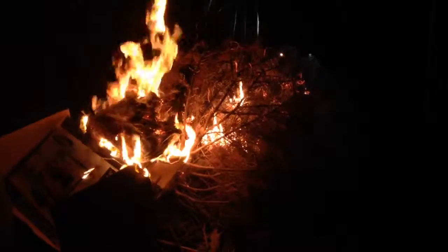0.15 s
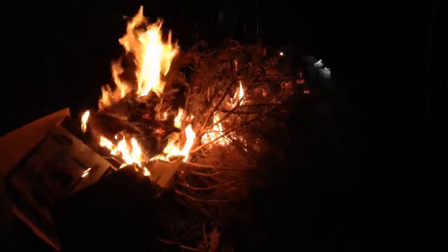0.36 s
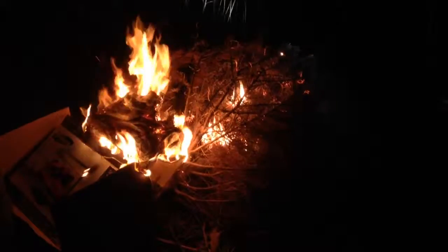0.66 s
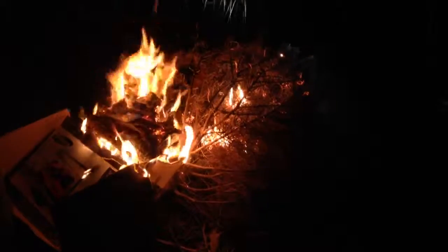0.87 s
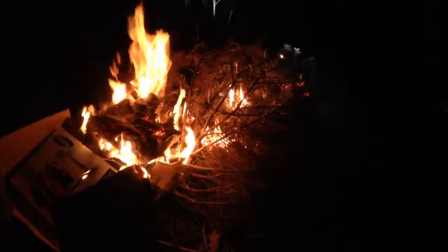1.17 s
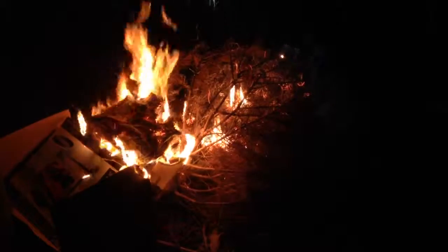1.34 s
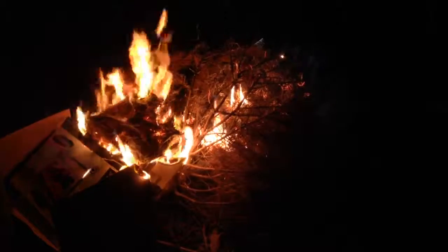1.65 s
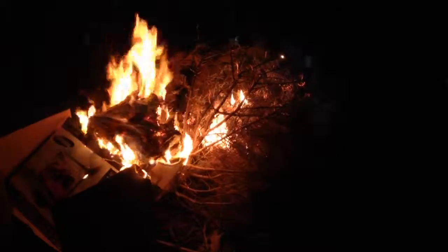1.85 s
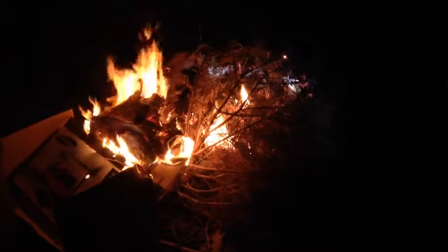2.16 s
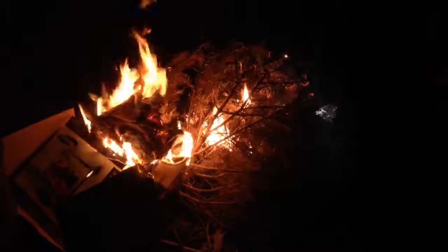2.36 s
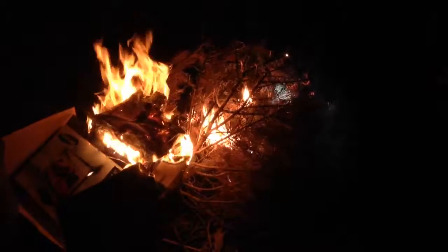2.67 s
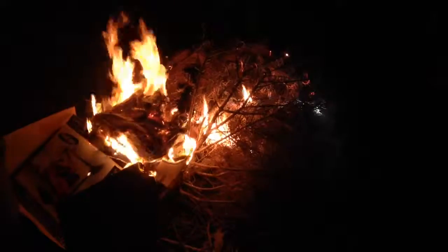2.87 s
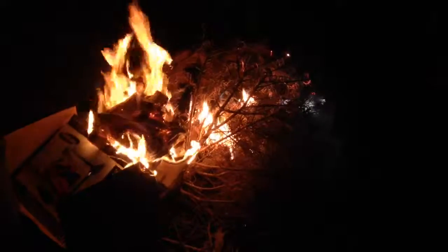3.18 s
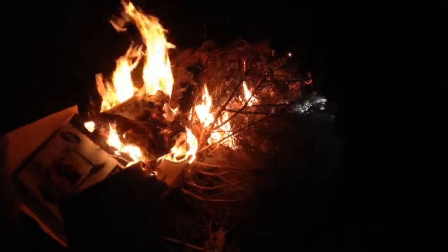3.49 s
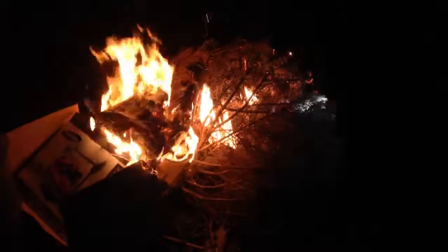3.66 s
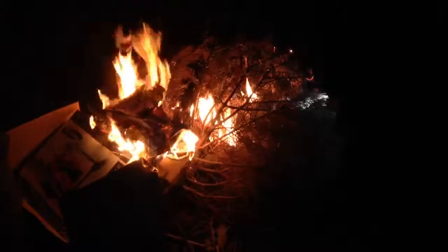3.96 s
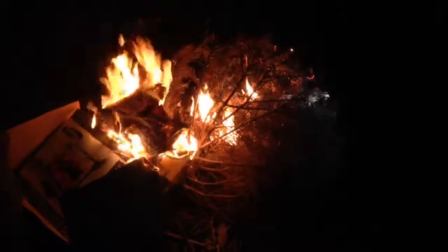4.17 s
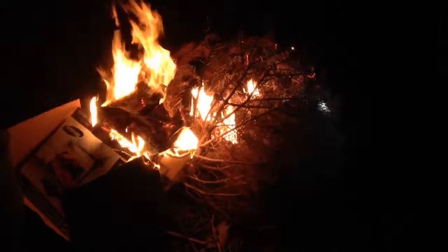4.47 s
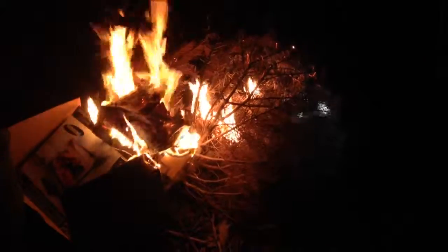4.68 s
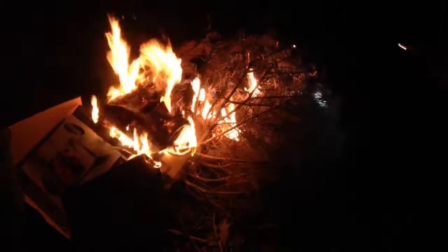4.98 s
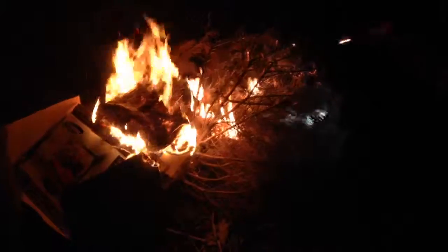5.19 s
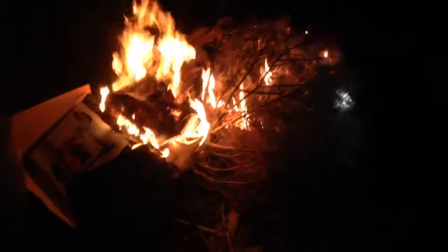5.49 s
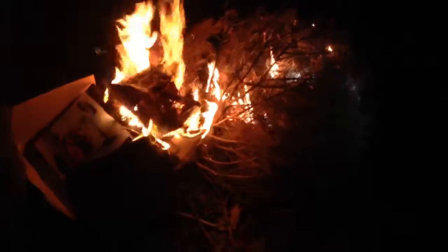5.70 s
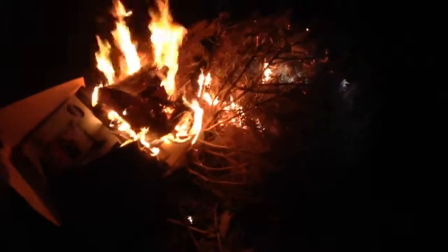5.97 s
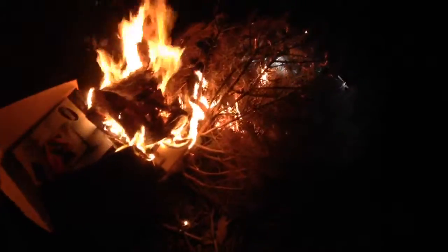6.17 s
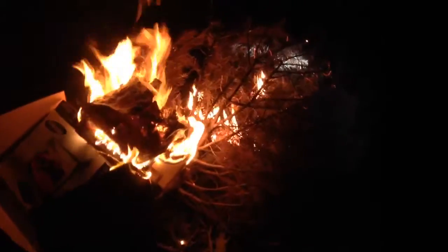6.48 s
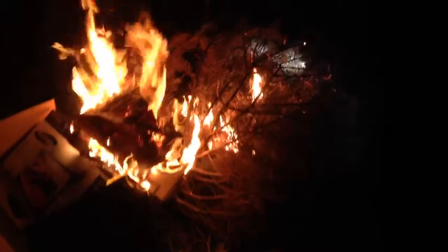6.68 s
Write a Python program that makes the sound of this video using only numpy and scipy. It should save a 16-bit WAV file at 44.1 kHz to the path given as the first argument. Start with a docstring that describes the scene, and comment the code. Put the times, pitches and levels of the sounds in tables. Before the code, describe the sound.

A small open fire of dry fir twigs and cardboard burns outdoors at night, heard close, dry and in mono for nearly seven seconds. Throughout, flames flutter low and rush unevenly under fine sizzling and hundreds of faint ticks. Faint, very high whistles flicker in the first 0.4 s. From 0.44 to 0.62 s a rapid volley of bright, splintering cracks peaks at 0.53 with the loudest, ringing snap; a smaller snap and sizzling flare follow at 0.8. Sizzle swells around 1.5 and 2.3 s, with crisp snaps at 1.83, 2.34 and 2.47. From 3 to 4.6 s it is calmer: soft low puffs, small ticks. At 4.7 s a brief squeaky gas spurt comes with a sizzle. At 5.13 a hard crack and thud start a second volley, lasting until 5.26. Then light crackling continues, with a tiny chirping hiss at 6.12, to the end.

```python
"""Twigs and resin pockets burst with sharp cracks as a dry fir tree and a cardboard box burn in the open at night.
Each crack is a ragged noise spike with a splintering tail, heard through resonances; some leave a twig ringing.
Needles sizzle in flares as dense clicks over hiss; gas escapes as jets of narrow noise and gliding whistles.
Underneath, the flames are shaped noise, fluttering and rushing, with soft puffs of decaying low tone."""
import sys
import numpy as np
from scipy import signal
from scipy.fft import rfft, irfft
from scipy.io import wavfile

SR = 44100
rng = np.random.default_rng(int(sys.argv[2]) if len(sys.argv) > 2 else 0)


def pcm_store(signal):
    """Save signal as 16-bit PCM."""
    levels = np.round(np.clip(np.atleast_2d(signal), -1, 1) * 32767)
    wavfile.write(sys.argv[1], SR, levels.astype(np.int16).T)


N = 301644   # samples


def from_db(db):
    """Decibels to amplitude gain."""
    return 10 ** (np.asarray(db) / 20)


def rms_one(x):
    """Scale to unit mean power."""
    return x / np.sqrt(np.mean(x ** 2) + 1e-20)


def energy_one(x):
    """Scale to unit summed energy."""
    return x / np.sqrt(np.sum(x ** 2) + 1e-20)


def level_over_1_ms(x):
    """Scale to the energy of 1 ms at unit RMS."""
    return energy_one(x) * np.sqrt(SR / 1000)


def curve(rows):
    """Interpolate rows of (seconds, value) to every sample."""
    s, value = np.transpose(rows)
    return np.interp(np.arange(N) / SR, s, value)


def add(out, start_s, sound):
    """Mix a sound into out, cut off at the end."""
    start = int(np.clip(round(start_s * SR), 0, N - 1))
    out[start:start + len(sound)] += sound[:N - start]


def drift(knots_per_s):
    """Random wander of unit RMS, linear between Gaussian knots."""
    knots = rng.standard_normal(N // 20)
    position = np.arange(N) / SR * knots_per_s
    return rms_one(np.interp(position, np.arange(len(knots)), knots))


def resonance(x, hz, width_hz):
    """Two-pole band-pass with unit gain at its peak."""
    hz_safe, width_safe_hz = min(hz, .4 * SR), min(width_hz, .35 * SR)
    b, a = signal.iirpeak(hz_safe, hz / width_safe_hz, fs=SR)
    return signal.lfilter(b, a, x + 1e-18)


def coloured(x, spectrum):
    """Filter x by a spectrum interpolated over log frequency; unit power."""
    hz, db = np.transpose(spectrum)
    bin_hz = np.maximum(np.arange(N // 2 + 1) * SR / N, 1)
    gain_db = np.interp(np.log(bin_hz), np.log(hz), db)
    return rms_one(irfft(rfft(x) * from_db(gain_db), N))


def grains(per_s, spread_db):
    """Single-sample clicks at random, most small and a few large."""
    size = from_db(spread_db * np.minimum(rng.exponential(1, N), 4))
    present = rng.random(N) < per_s / SR
    return present * size * rng.choice([-1, 1], N)


# Strength of the flames. Each row: time in seconds, rush level in dB before flicker.
FLAME_STRENGTH = [(0.0, -63.5), (0.42, -61), (0.62, -72.5), (1.0, -68), (1.35, -70), (1.6, -64.5),
                  (1.87, -68), (3.03, -64), (3.27, -66), (4.0, -63), (4.36, -67), (5.26, -66.5),
                  (5.79, -63.5), (6.15, -66), (6.84, -66.5)]
# Spectrum of the low flutter. Each row: frequency in Hz, relative density in dB per Hz.
FLUTTER_SPECTRUM = [(25, -35), (50, -48), (80, -11.5), (120, -6), (180, 2), (250, -2.5), (400, -4.5),
                    (800, -27.5)]
# Spectrum of the hot gas. Each row: frequency in Hz, relative density in dB per Hz.
RUSH_SPECTRUM = [(200, -25), (400, 2), (600, 1), (1000, 2.5), (1600, -4), (3000, -4.5), (6000, -33),
                 (15000, -39)]


def flames(flutter_mean_db=-67, flutter_follows=0.66, lumpy_db=2.5, flicker_db=2.18):
    """Unsteady burning: a lumpy low flutter and a grainy rush of hot gas."""
    rush_db = curve(FLAME_STRENGTH)
    # the flutter takes a share of the rush's swing
    flutter_db = flutter_mean_db + flutter_follows * (rush_db - rush_db.mean())
    lumpy_noise = rng.standard_normal(N) * from_db(lumpy_db * drift(70))
    flutter = coloured(lumpy_noise, FLUTTER_SPECTRUM)
    grainy_noise = rms_one(grains(1300, spread_db=2.5)) + 1.15 * rng.standard_normal(N)
    rush = coloured(grainy_noise, RUSH_SPECTRUM)
    flickering_db = rush_db + flicker_db * drift(25)
    return from_db(flutter_db) * flutter + from_db(flickering_db) * rush


# Pockets of gas catching light. Each row: start in seconds, peak in dB before gain_db and low cut, pitch in Hz.
GAS_PUFFS = [(0.31, -43.5, 194), (1.073, -47.5, 197), (1.477, -37.5, 202), (2.107, -49, 254),
             (2.233, -42, 171), (2.958, -39, 189), (2.979, -38, 183), (3.021, -42, 283),
             (3.159, -42.5, 191), (3.185, -42.5, 203), (3.222, -49, 174), (3.472, -49, 180),
             (3.526, -49, 179), (3.611, -40.5, 194), (3.745, -44, 220), (3.991, -45.5, 215),
             (4.118, -43, 194), (4.249, -46.5, 200), (4.348, -46, 180), (4.472, -43.5, 218),
             (4.707, -42, 310), (5.129, -33.5, 272), (5.358, -46, 191.8), (5.589, -50, 207),
             (5.881, -41, 186), (6.032, -45.5, 210), (6.339, -43, 180)]


def puffs(gain_db=-6.0, cycles_to_peak=0.74, uneven=0.27, low_cut_hz=105,
          small_count=30, small_db=-57.5, small_spread_db=2.0, small_hz=183, spread_octaves=0.36):
    """A pocket of gas lights with a low thud of a cycle or two; small ones come at random."""
    out, t = np.zeros(N), np.arange(SR // 20) / SR
    events = [(s, db + gain_db, hz) for s, db, hz in GAS_PUFFS]
    for _ in range(small_count):
        size, pitch = rng.standard_normal(2)
        hz = small_hz * 2 ** (spread_octaves * pitch)
        events.append((rng.random() * N / SR, small_db + small_spread_db * size, hz))
    for s, db, hz in events:
        stretch = np.exp(uneven * rng.uniform(-1.5, 1))   # some are curt, some linger
        age = t * hz / (cycles_to_peak * stretch)
        swell = age ** 2 * np.exp(2 * (1 - age))
        add(out, s, from_db(db) * swell * np.sin(2 * np.pi * hz * t))
    return signal.sosfilt(signal.butter(2, low_cut_hz, "high", fs=SR, output="sos"), out)


# Sizzle between flares. Each row: time in seconds, level in dB before wander and the gain in needles().
SMOULDER_LEVEL = [(0, -72.5), (1.15, -63.5), (1.32, -74), (1.5, -68), (2.05, -71), (2.6, -68.5), (4.3, -68),
                  (5.5, -67.5), (6.84, -68)]
# Sprigs of needles flaring up. Each row: time of the height in seconds, sizzle in dB before the gain in
# needles(), time constant of catching in seconds, time constant of dying down in seconds.
NEEDLE_FLARES = [(0.17, -62.5, 0.079, 0.19), (0.52, -54.5, 0.073, 0.15), (0.803, -49, 0.039, 0.035),
                 (0.98, -57.5, 0.096, 0.1), (1.14, -64.5, 0.062, 0.16), (1.44, -55, 0.042, 0.069),
                 (1.585, -51.5, 0.082, 0.085), (1.72, -58, 0.078, 0.13), (1.84, -57.5, 0.042, 0.097),
                 (2.22, -55.5, 0.047, 0.1), (2.39, -53.5, 0.12, 0.13), (2.92, -58.5, 0.069, 0.15),
                 (3.17, -61, 0.01, 0.027), (3.462, -63.5, 0.008, 0.03), (3.95, -64, 0.026, 0.055),
                 (4.65, -57, 0.012, 0.0072), (4.702, -51.5, 0.0068, 0.03), (5.17, -51, 0.068, 0.12),
                 (5.264, -56, 0.012, 0.046), (5.574, -61.5, 0.024, 0.043), (5.76, -65.5, 0.11, 0.15),
                 (5.962, -53, 0.005, 0.042), (6.14, -59.5, 0.025, 0.14), (6.33, -62, 0.031, 0.057),
                 (6.51, -67, 0.018, 0.018)]


def flaring(restless_db=-0.36, restless_per_s=22):
    """Sizzle level in dB: each flare grows and dies exponentially, on top of a restless smoulder."""
    now = np.arange(N) / SR
    power = from_db(curve(SMOULDER_LEVEL) + restless_db * drift(restless_per_s)) ** 2
    for height_s, db, catch_s, die_s in NEEDLE_FLARES:
        decay = np.maximum((height_s - now) / catch_s, (now - height_s) / die_s)
        power = power + (from_db(db) * np.exp(-decay)) ** 2
    return 10 * np.log10(power)


# Spectrum of the sizzle. Each row: frequency in Hz, relative density in dB per Hz.
SIZZLE_SPECTRUM = [(300, -16), (700, -8.5), (1500, -1.5), (4000, 2.5), (7000, 1), (10000, -2), (12000, -4),
                   (15500, -8)]


def needles(gain_db=0.56, quiet_per_s=2600, quiet_db=-64.5, crowding=0.45,
            steam_db=-0.5, spread_db=3.5, sputter_db=1.5):
    """Countless tiny bursts over a hiss of steam; a flare makes them louder and denser."""
    flare_db = flaring()
    vigour = from_db(crowding * (flare_db - quiet_db))
    # the root evens out the power, so density alone changes here
    bursts = rms_one(grains(quiet_per_s * vigour, spread_db) / np.sqrt(vigour))
    steam = from_db(steam_db) * rng.standard_normal(N)
    sizzle = coloured(bursts + steam, SIZZLE_SPECTRUM)
    clumps_db = sputter_db * drift(180)   # needles catch in clumps
    return from_db(flare_db + gain_db + clumps_db) * sizzle


# Gas forced out of the wood. Each row: start in seconds, length in seconds (pressure down to exp(-2)),
# pitch in Hz, width in Hz, level in dB before the pressure envelope.
GAS_JETS = [(1.005, 0.54, 6360, 130, -77), (3.954, 1.2, 6400, 90, -82), (4.328, 0.41, 6400, 90, -82),
            (4.701, 0.12, 1150, 700, -57.5), (6.126, 0.025, 3870, 450, -56.5),
            (6.196, 0.023, 3570, 800, -57.5)]


def jets(onset_s=0.00066):
    """Gas hisses through splits in the wood: band-passed noise under a falling pressure."""
    out, t = np.zeros(N), np.arange(2 * SR) / SR
    for s, length_s, hz, width_hz, db in GAS_JETS:
        pressure = (1 - np.exp(-t / onset_s)) * np.exp(-2 * (t / length_s) ** 2)
        # boiling sap breaks up the flow
        spitting = rng.standard_normal(len(t)) * np.exp(rng.standard_normal(len(t)))
        hiss = rms_one(resonance(spitting, hz, width_hz))
        add(out, s, from_db(db) * pressure * hiss)
    return out


# Whistles and squeaks from pinholes in the bark. Each row: start in seconds, length in seconds,
# pitch at full pressure in Hz before waver, peak in dB.
PINHOLES = [(0.04, 0.029, 2520, -62.5), (.104, 0.073, 12600, -71), (.182, 0.082, 12700, -68),
            (0.28, 0.034, 13250, -67), (.318, .07, 12620, -69), (4.699, 0.011, 1106, -46.5),
            (4.707, 0.043, 675, -54), (4.724, .023, 1337, -55), (6.122, 0.059, 4050, -58)]


def whistle(waver_hz=40, sag=0.045):
    """Each spurt of gas swells and fades; pitch and loudness follow its pressure."""
    out, waver = np.zeros(N), waver_hz * drift(310)
    for s, length_s, hz, db in PINHOLES:
        pressure = np.sin(np.linspace(0, np.pi, int(length_s * SR)))
        pitch_hz = hz * (1 - sag * (1 - pressure)) + waver[:len(pressure)]
        add(out, s, from_db(db) * pressure * np.sin(2 * np.pi * np.cumsum(pitch_hz) / SR))
    return out


def crack(hz, width_hz, tail_db, wood_db, spike_s=0.00044, tail_onset_s=0.00032, splinter_s=0.003,
          scatter_s=0.014, scatter_db=-19.5, air_db=-37.0, skirt=0.043,
          wood_hz=1120, wood_width_hz=900, thud_hz=320, thud_db=-4.0, band_hz=(220, 14000)):
    """One burst: a pressure spike, fibres tearing after it, and scatter from the branches and ground."""
    t = np.arange(SR // 16) / SR
    ragged, tearing, scatter = rng.standard_normal((3, len(t)))
    # the wall gives way raggedly
    spike = energy_one((t == 0) + .25 * ragged * np.exp(-t / spike_s))
    tail_envelope = np.exp(-t / splinter_s) * (1 - np.exp(-t / tail_onset_s))
    tail = energy_one(tearing * np.abs(tearing) * tail_envelope)
    burst = energy_one(spike + from_db(tail_db) * tail)
    scattered = energy_one(scatter * np.abs(scatter) * np.exp(-t / scatter_s))
    burst = burst + from_db(scatter_db) * scattered
    # small pockets ring higher and radiate little bass
    snap = resonance(burst, hz, width_hz)
    snap = energy_one(signal.lfilter(*signal.butter(2, skirt * hz, "high", fs=SR), snap))
    knock = energy_one(resonance(burst, wood_hz, wood_width_hz))   # the twig itself recoils
    thud = energy_one(resonance(burst, thud_hz, 450))              # and shakes its branch
    air = energy_one(resonance(burst, 4000, 6600))                 # the bare report of the escaping gas
    wood = knock + from_db(thud_db) * thud
    sound = snap + from_db(wood_db) * wood + from_db(air_db) * air
    sound = signal.lfilter(*signal.butter(2, band_hz, "band", fs=SR), sound)
    return level_over_1_ms(sound)


def small_cracks(count=480, level_db=-60.0, spread_db=1.2, pitch_hz=2200, range_octaves=3.6,
                 breadth=0.67, tail_db=0.0, wood_db=-12.0, follows=0.43):
    """Faint ticks at random from all over the pile, stronger when the flames are."""
    out, rush_db = np.zeros(N), curve(FLAME_STRENGTH)
    heat_db = follows * (rush_db - rush_db.mean())
    for when, size, pitch in rng.random((count, 3)):
        db = level_db + heat_db[int(when * N)] + spread_db * min(-np.log(size), 3)
        hz = pitch_hz * 2 ** (range_octaves * (pitch - .5))
        add(out, when * N / SR, from_db(db) * crack(hz, breadth * hz, tail_db, wood_db))
    return out


def twig_ticks():
    """Duller ticks from twigs, with more wood in them."""
    return small_cracks()


def needle_ticks():
    """Brighter ticks from needles, with less wood in them."""
    return small_cracks(count=130, level_db=-59.5, spread_db=2.6, pitch_hz=7500, range_octaves=3.8,
                        breadth=0.57, tail_db=-2.0, wood_db=-21.0)


# Twigs left ringing by a burst. Each row: start in seconds, pitch in Hz, level over 1 ms in dB.
TWIG_RINGS = [(0.443, 2900, -45), (0.474, 2960, -44), (0.499, 960, -38), (0.5263, 1440, -37),
              (0.5263, 4850, -23), (0.525, 6950, -29), (0.5458, 4800, -31), (0.5598, 4810, -36),
              (0.8167, 3170, -43), (1.8312, 2770, -39), (2.3416, 4220, -42), (2.4676, 4100, -49),
              (3.2766, 4400, -57), (3.4472, 3480, -40.5), (3.446, 2290, -50), (3.5989, 4900, -55),
              (4.4303, 925, -53), (4.9005, 910, -47.5), (5.1288, 1520, -29.5), (5.1293, 2070, -35),
              (5.1291, 4860, -34), (5.1407, 3640, -37), (5.1411, 8460, -37), (5.147, 4300, -37),
              (5.158, 1360, -38), (5.196, 4500, -32), (5.2094, 10130, -35), (5.2094, 2310, -38),
              (5.2151, 1320, -35.5), (5.2622, 3800, -41), (5.9867, 1920, -48), (6.438, 2820, -45)]


def rings(width_hz=190):
    """The stub of a burst twig rings on for a few milliseconds, a decaying cosine."""
    out, t = np.zeros(N), np.arange(SR // 40) / SR
    for s, hz, db in TWIG_RINGS:
        ring = np.exp(-np.pi * width_hz * t) * np.cos(2 * np.pi * hz * t)
        add(out, s, from_db(db) * level_over_1_ms(ring))
    return out


# Bursting twigs. Each row: start in seconds, level over 1 ms in dB, pitch in Hz, width of the ring in Hz,
# splintering tail against the first spike in dB, woody knock against the snap in dB.
TWIG_BURSTS = [(0.138, -40, 930, 700.0, -19, 7), (0.295, -47, 2040, 950.0, -4, -19),
               (0.4444, -38.5, 3270, 4000.0, -13, -5), (0.4732, -37, 4330, 7900.0, 9, -3),
               (0.4928, -36, 5240.0, 3900.0, -16, -29), (0.495, -25.5, 7540.0, 14100, 8, -26),
               (0.4986, -26, 6500, 14000, 1, -16), (0.5065, -42, 7000, 12000, -5, -4),
               (0.5261, -14.5, 4940, 5900, -3.5, -9.5), (0.5458, -23, 6890.0, 8300.0, -4, -9.5),
               (0.5598, -20, 4300, 10300, -6, -12), (0.579, -37, 5240.0, 3900.0, -7, -10),
               (0.584, -41, 4400, 2400, -9, -17), (0.5922, -47, 4000, 6000, -3, -10),
               (0.621, -35.5, 6240, 7500.0, 14, -13.5), (0.6532, -47.5, 4370.0, 2000.0, -13, -18),
               (0.7618, -46.5, 1620, 440.0, 1, -5), (0.805, -41, 6290.0, 11000.0, -8, -15),
               (0.8166, -31, 4760, 8700, 10, -11), (0.943, -42, 10800.0, 8100.0, -15, -24),
               (0.9606, -42, 9900.0, 4500.0, -15, -9), (0.9914, -43.5, 9040.0, 4100.0, -18, -26),
               (0.9965, -45, 3060, 3700.0, -4, -23), (1.015, -44, 4370.0, 7900.0, -2, -26),
               (1.039, -44, 5240.0, 3900.0, -6, -29), (1.0932, -49.5, 9040.0, 16000.0, -3, -26),
               (1.2082, -50.5, 3040.0, 1460, -5, 2), (1.248, -46.5, 1750, 2100.0, 7, -12),
               (1.447, -49.5, 5740.0, 6900.0, -1, -29), (1.4774, -47.5, 650.0, 780.0, 19, -24),
               (1.577, -41.5, 1930.0, 1400.0, -1, 3), (1.6177, -39, 13000.0, 16000.0, -3, -9),
               (1.6869, -40, 5160, 6300.0, 1, -11), (1.7063, -43, 5240.0, 9400.0, -1, -26),
               (1.7395, -43.5, 7540.0, 3400.0, -4, -22), (1.772, -41.5, 4370.0, 7900.0, 16, -5),
               (1.825, -43, 3650.0, 4450, -7, -26), (1.8309, -36.5, 3280, 4200, 0, -11),
               (1.8425, -42, 3650.0, 2700.0, 1, -26), (1.954, -44, 720, 320.0, -3, -18),
               (2.034, -50, 6290.0, 7500.0, 7, -2), (2.157, -51.5, 4790.0, 8600.0, -10, -20),
               (2.1985, -44, 5740.0, 2600.0, -3, -5), (2.2115, -43.5, 7540.0, 5700.0, -8, -2),
               (2.2256, -43, 9040.0, 11000.0, 0, 0), (2.2558, -40.5, 3650.0, 6600.0, -11, -15),
               (2.2615, -37.5, 5700, 2600.0, -3, -12), (2.3415, -33, 4270, 5200.0, -5, -4.5),
               (2.4684, -32, 7400, 14200, 13, -11.5), (2.544, -40, 8260.0, 15000.0, -6, -10.5),
               (2.5759, -36.5, 13000.0, 5800.0, -5, -40), (2.6084, -47, 5740.0, 6900.0, 3, -18),
               (2.6168, -40.5, 2070, 950.0, 3, 3), (2.6346, -48, 4790.0, 5700.0, -6, -14),
               (2.7718, -48, 3650.0, 2680, 2, -6), (2.828, -45.5, 4760, 8600.0, -3, -26),
               (2.867, -47.5, 5700, 690.0, 2, -21), (2.94, -46, 4790.0, 3600.0, 3, -23),
               (2.9521, -44.5, 650.0, 490.0, -6, -2), (2.9907, -49, 6250, 2800.0, -4, -23),
               (3.0207, -45, 650.0, 1210, 20, -24), (3.0577, -43, 2340, 1700.0, -3, 4),
               (3.1452, -46, 1900, 1400.0, -4, -11), (3.1734, -42.5, 1220, 920.0, -3, -15),
               (3.2764, -47.5, 4370.0, 3300.0, -3, -25), (3.447, -42, 3540, 600, 2, -14.5),
               (3.4727, -50.5, 11900.0, 8900.0, -3, -6), (3.5668, -49.5, 11900.0, 8900.0, -12, -26),
               (3.5993, -41, 2000, 3200, 7, -5), (3.839, -43.5, 3300, 4000.0, 0, 3),
               (4.0074, -42.5, 3600, 6600.0, 0, -6), (4.04, -48.0, 1760.0, 440.0, -8, -2),
               (4.119, -47.5, 650.0, 1200.0, 2, -14), (4.2193, -45, 1230.0, 1500.0, 20, 8),
               (4.2557, -49, 7460, 5700.0, 13, -5), (4.43, -41.5, 2950, 1400.0, 4, 8),
               (4.4668, -47, 650.0, 1200.0, 3, -28), (4.655, -47.5, 650.0, 1200.0, 11, -2),
               (4.6884, -42.5, 3040.0, 1400.0, 10, -26), (4.702, -44, 3990.0, 4800.0, 6, 8),
               (4.706, -43, 5740.0, 6900.0, 10, -7), (4.715, -47, 2000, 2000.0, 3, -12),
               (4.7285, -48, 4200, 4000, -3, -8), (4.7352, -47, 2800, 3500, -3, -3),
               (4.9006, -44.5, 2750, 1300.0, -10, 8), (5.1291, -23, 3800, 4200, -3, -5.5),
               (5.1409, -28.5, 3780, 3000, -7, -12), (5.149, -30.5, 4340, 6500, -2, -10),
               (5.158, -28, 4800, 9000, 12, -24), (5.165, -29.5, 6600, 6000, 4, -32),
               (5.195, -29, 6000, 3600, -4, -20), (5.2094, -27, 5850, 9900, -1, -30),
               (5.2147, -31, 3900, 7500, 4, -16), (5.2584, -40, 7500, 3400.0, -9, -6),
               (5.2623, -38, 3990.0, 4800.0, 0, -28), (5.307, -45, 3990.0, 3000.0, 10, -16),
               (5.423, -44.5, 3350, 6040, 14, -15), (5.4782, -44, 779.0, 580.0, -3, -4),
               (5.5628, -46.5, 3650.0, 2700.0, -5, -4), (5.5811, -43, 7500, 5700.0, -9, -32),
               (5.7694, -42.5, 5670, 4300.0, -9, -26), (5.836, -47, 4790.0, 3600.0, 10, -8),
               (5.883, -48.5, 650.0, 490.0, 7, -23), (5.9322, -42, 3020, 5500.0, 5, -3),
               (5.9531, -41.5, 4760, 5700.0, -1, -16), (5.987, -44.5, 1580, 1200.0, 11, 0),
               (6.1048, -49.5, 3990.0, 3000.0, -4, -20), (6.2665, -50.5, 10800.0, 8100.0, -10, -8),
               (6.3292, -45, 650.0, 290.0, -9, -35), (6.439, -46.5, 2580, 2600, -12, -29),
               (6.5067, -49, 2780.0, 2100.0, 2, -7), (6.573, -45, 3330.0, 6000.0, -8, -39),
               (6.706, -47.5, 779.0, 1400.0, -1, -44), (6.717, -48, 3330.0, 1500.0, 15, -9)]


def loud_cracks():
    """The bursts that stand out of the fire, each a pocket's pressure let go at once."""
    out = np.zeros(N)
    for s, db, hz, width_hz, tail_db, wood_db in TWIG_BURSTS:
        add(out, s, from_db(db) * crack(hz, width_hz, tail_db, wood_db))
    return out


def scene():
    """The whole fire on one channel."""
    background = flames() + puffs() + needles()
    gas = jets() + whistle()
    bursts = twig_ticks() + needle_ticks() + rings() + loud_cracks()
    return (background + gas + bursts)[None]


# Colour of the microphone. Each row: centre in Hz, width at half the dB gain in Hz, gain in dB.
MICROPHONE_COLOUR = [(2574, 97, -4), (2960, 350, 2), (4300, 400, 3.5), (4920, 570, 5.5), (5440, 1650, -5.5),
                     (8380, 2000, 2.5), (10350, 370, 2)]


def record(dry, cutoff_hz=15500):
    """The microphone's peaks and dips, then a steep low-pass."""
    for hz, width_hz, db in MICROPHONE_COLOUR:
        pole_width_hz = width_hz * from_db(-db / 2)
        b, a = signal.iirpeak(hz, hz / pole_width_hz, fs=SR)
        dry = signal.lfilter(a + (from_db(db) - 1) * b, a, dry)
    return signal.sosfilt(signal.ellip(10, .3, 70, cutoff_hz, fs=SR, output="sos"), dry)


dry = scene()
out = record(dry)
pcm_store(out)
```